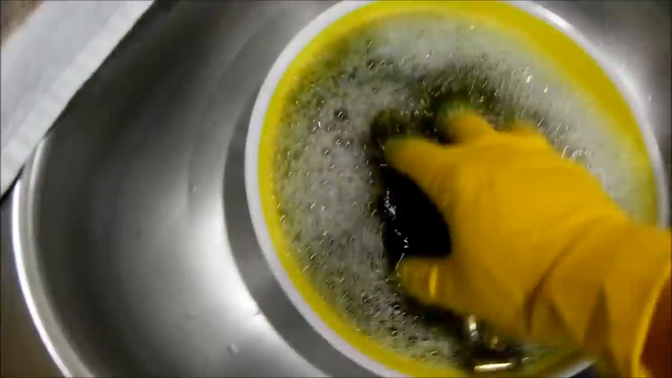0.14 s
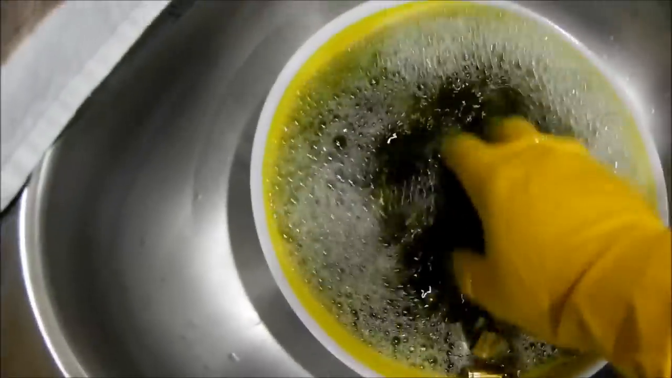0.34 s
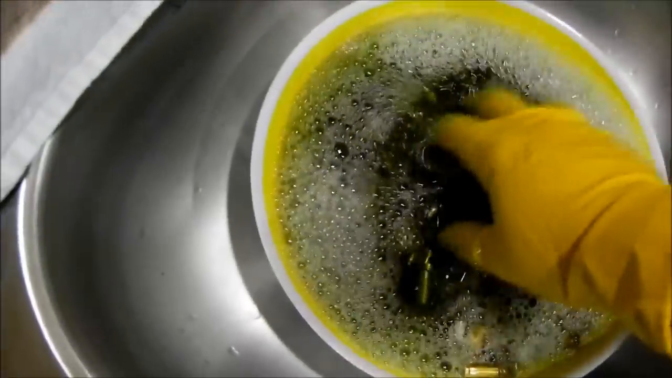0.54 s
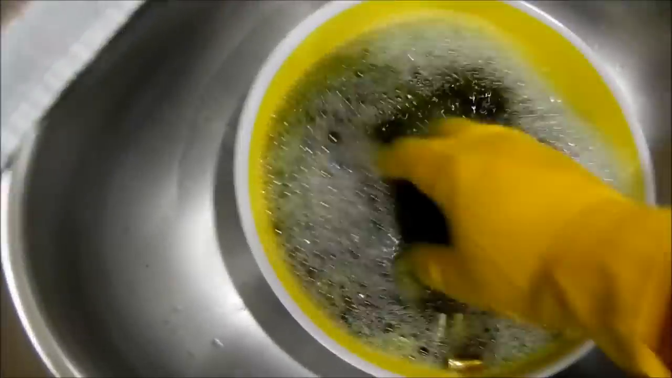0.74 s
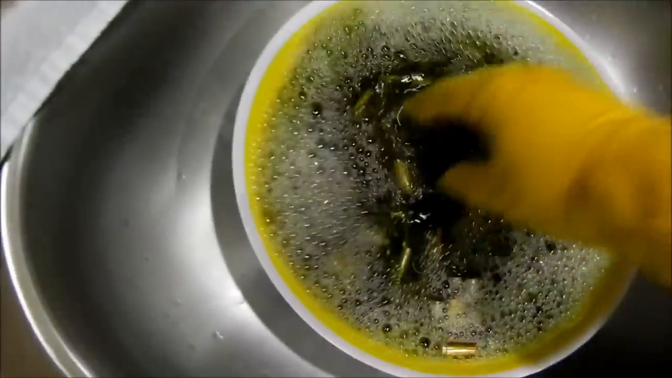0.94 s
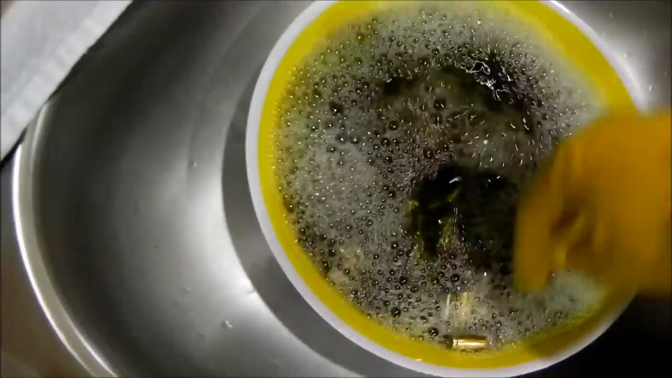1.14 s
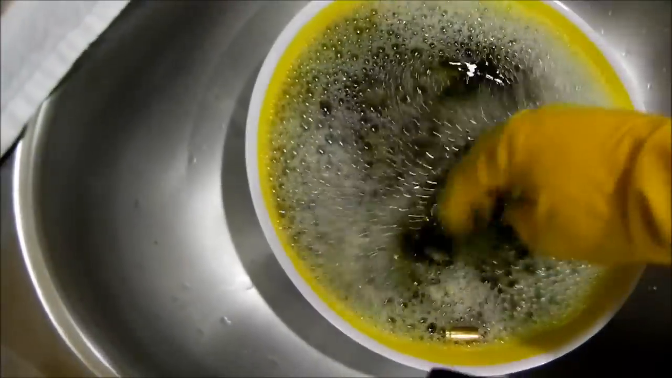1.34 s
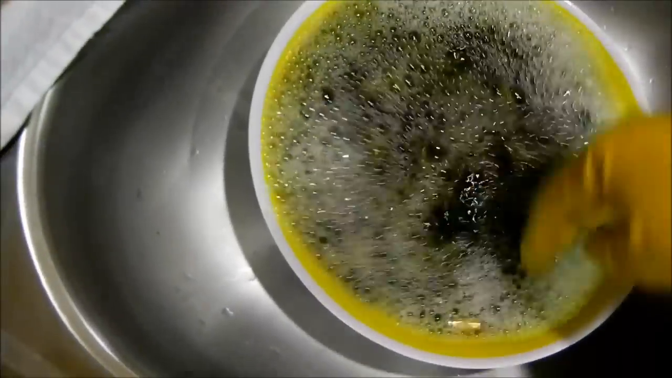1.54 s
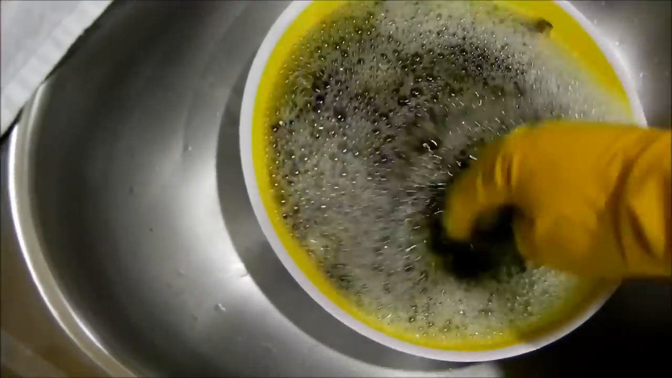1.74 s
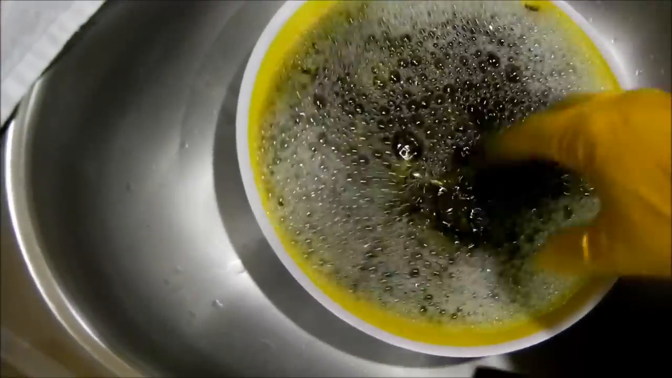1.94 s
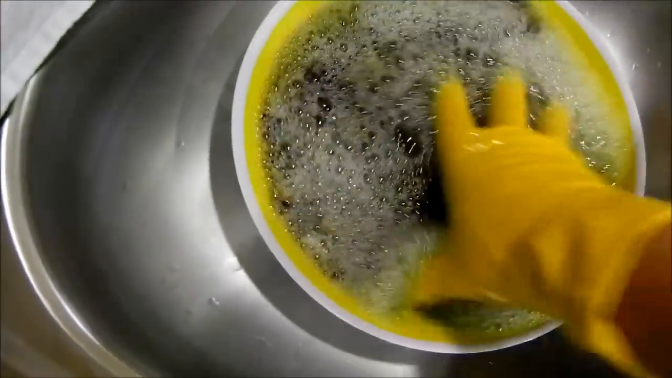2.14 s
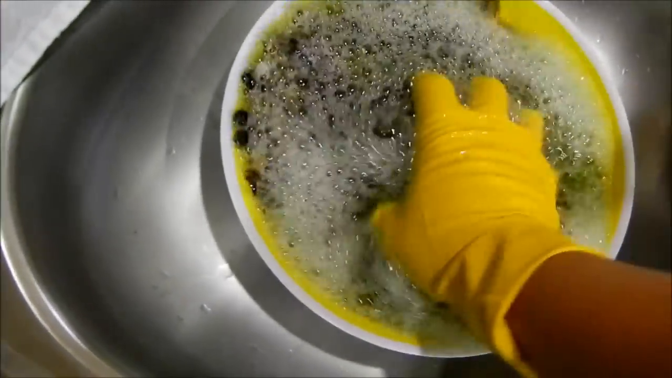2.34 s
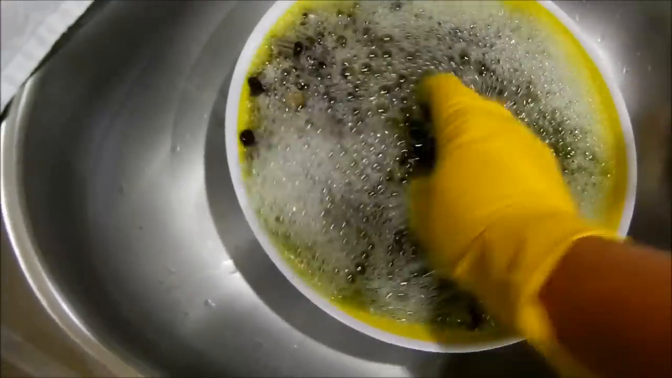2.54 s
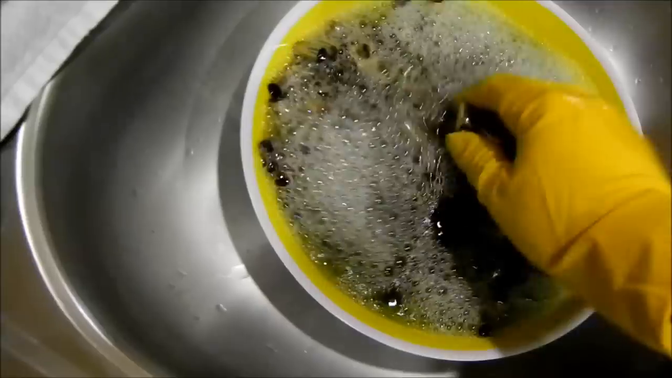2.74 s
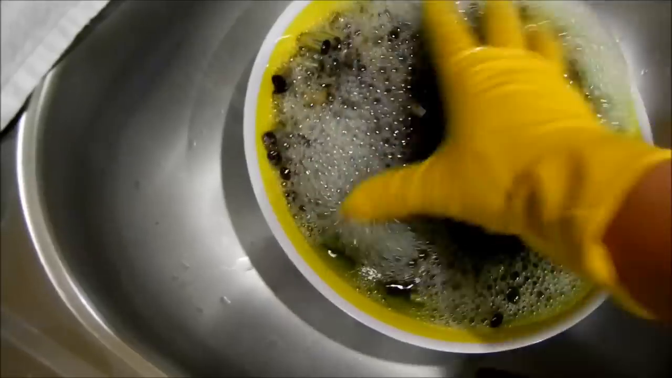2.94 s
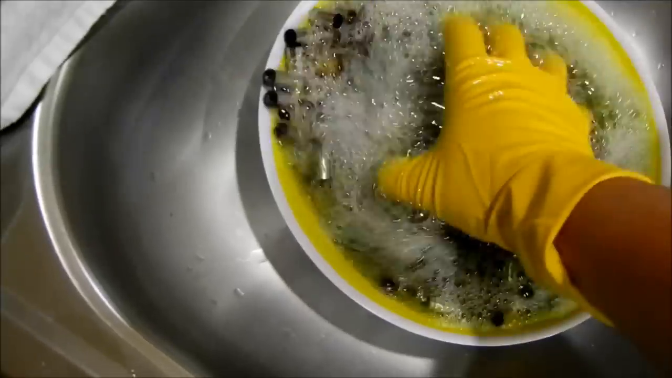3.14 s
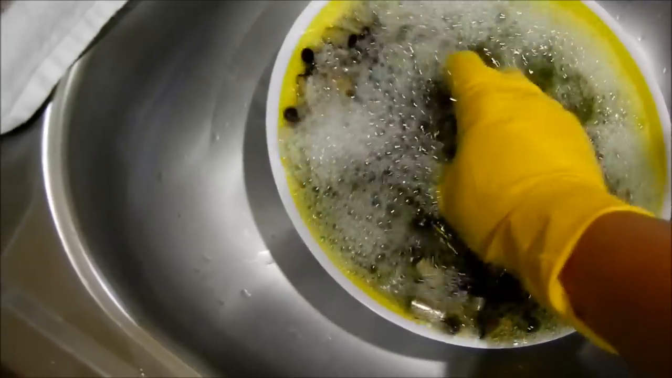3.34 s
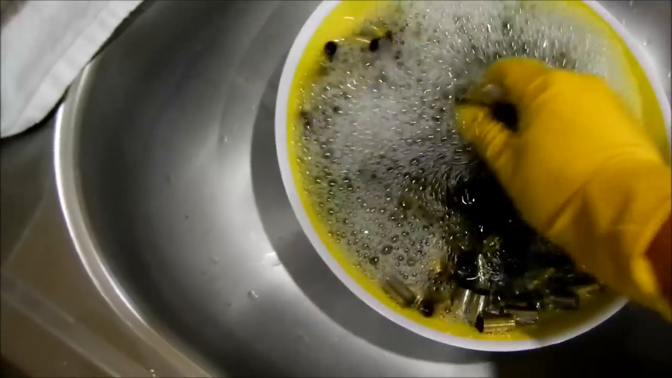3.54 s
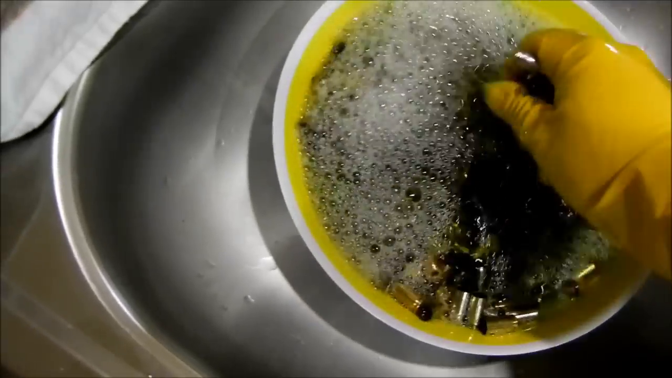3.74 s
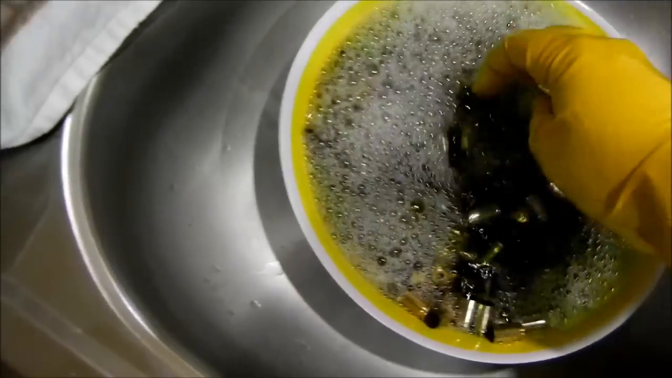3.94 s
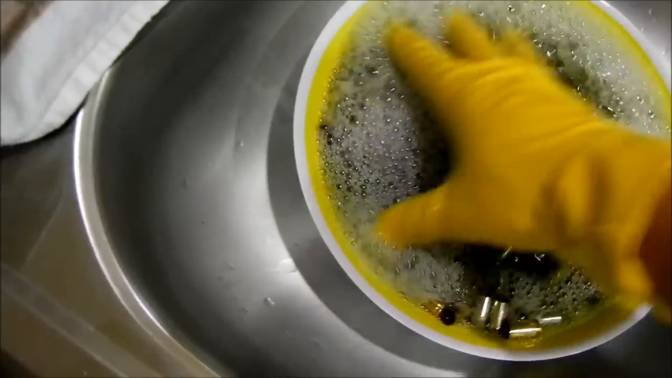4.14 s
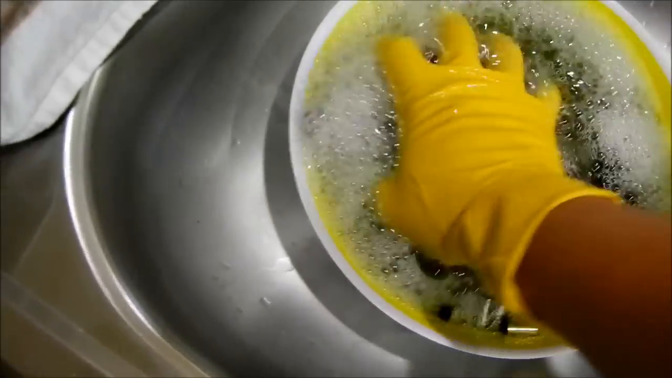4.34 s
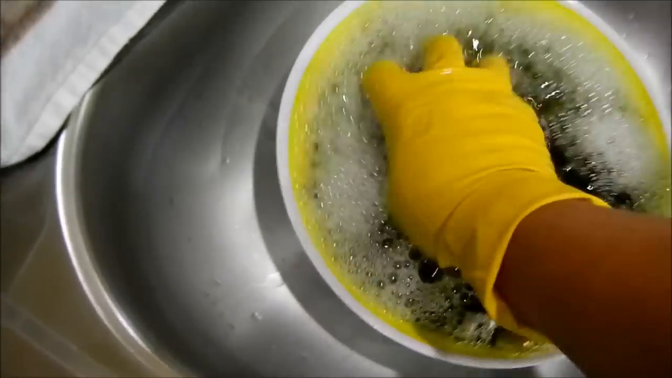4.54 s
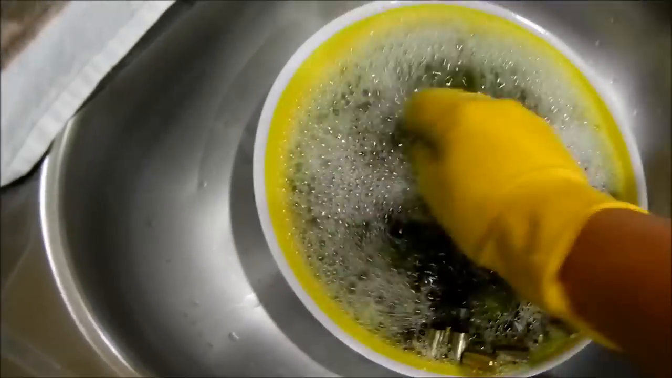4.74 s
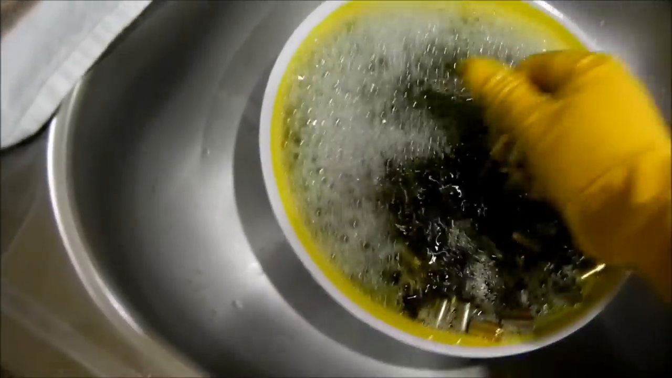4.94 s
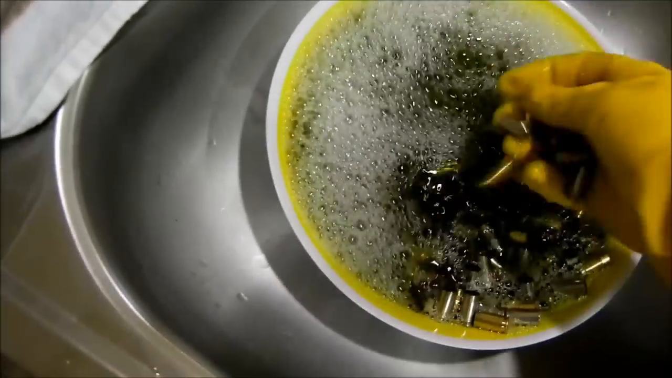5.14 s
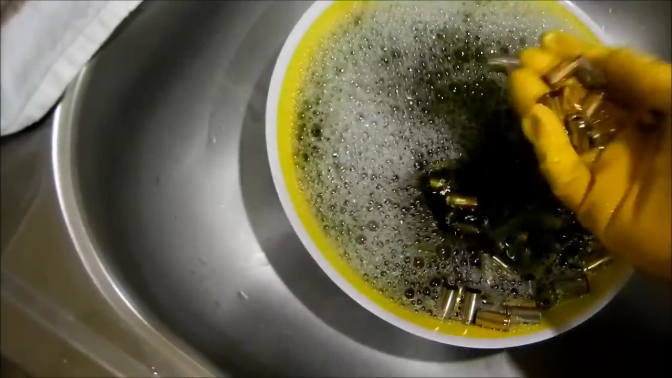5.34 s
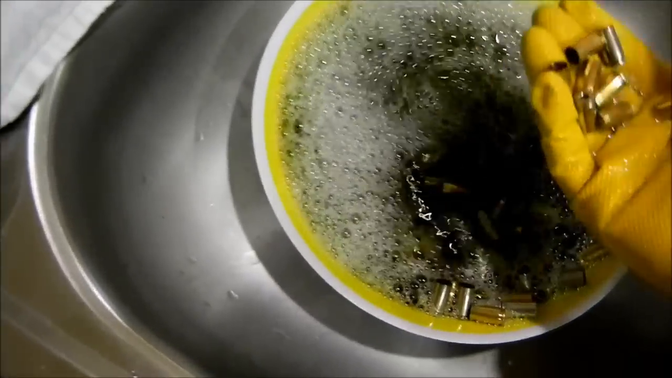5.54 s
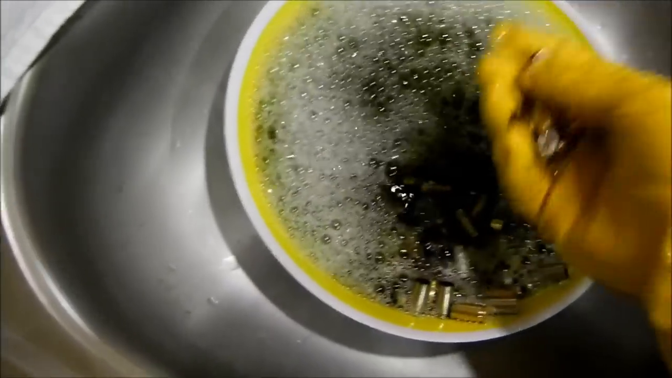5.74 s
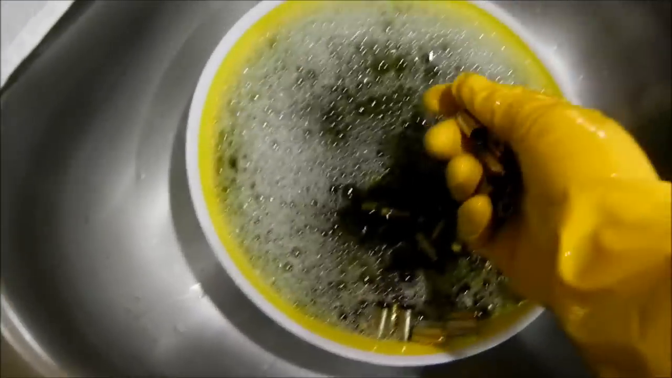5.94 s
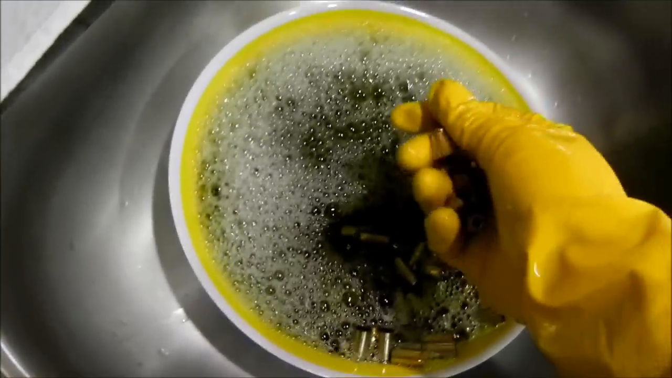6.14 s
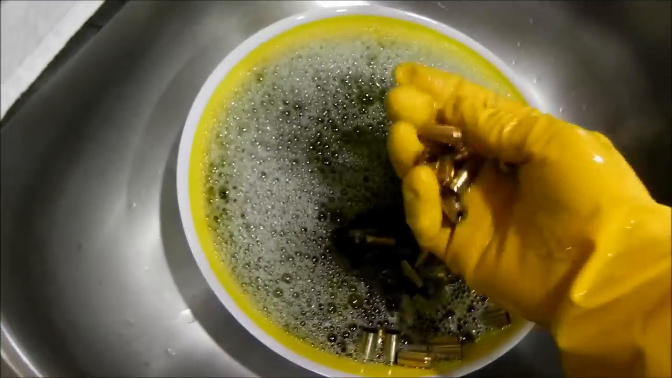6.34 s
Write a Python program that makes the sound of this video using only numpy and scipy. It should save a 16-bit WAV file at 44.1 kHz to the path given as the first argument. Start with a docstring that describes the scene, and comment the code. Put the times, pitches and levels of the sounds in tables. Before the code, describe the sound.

Metal cases grind and rattle underwater in a plastic bowl, followed by sharp clacks and high clinks, over a faint hum.

```python
"""Dense, wet grinding over a low drumming, then clacks and high rings, with a faint mains hum behind.
A gloved hand scrubs brass cartridge cases in a plastic bowl of soapy water, standing in a steel sink.
Under water the cases rub in damped contacts and drum on the bowl. Then a handful is lifted out:
single cases drop back with a clack, and those in the air ring high."""
import sys
import numpy as np
from scipy import signal
from scipy.fft import rfft, irfft, next_fast_len
from scipy.io import wavfile
from scipy.ndimage import map_coordinates

SR = 44100
rng = np.random.default_rng(int(sys.argv[2]) if len(sys.argv) > 2 else 0)


def int16_out(signal):
    """Quantize to a 16-bit WAV file."""
    q = np.round(np.clip(np.atleast_2d(signal).T, -1, 1) * 32767)
    wavfile.write(sys.argv[1], SR, q.astype(np.int16))


N = 286209

# Event levels are relative within each source.
# Hand strokes through the heap. Each row: start, length, rise and release t60 in seconds,
# grinding level in dB, sharp edges over grinding in dB, slosh level in dB.
HAND_STROKES = [(-.05, 0.25, 0.0041, .3, -19, -9.5, -50.5), (0.166, 0.62, 0.036, 0.49, -15, -7.5, -50),
                (0.709, 0.19, 0.065, 0.64, -14.5, -8.5, -54.5), (0.983, 0.21, 0.042, 0.14, -19, -8.5, -57),
                (1.285, 0.22, .008, 0.74, -13.5, -7.5, -39), (1.704, 0.21, 0.073, 0.66, -13, -6, -40),
                (1.971, 0.12, 0.033, 0.37, -19, -9, -41.5), (2.216, 0.25, 0.051, 0.9, -15, -5, -37),
                (2.484, .49, 0.1, 0.14, -15.5, -7.5, -62.5), (3.08, 0.2, 0.055, 0.52, -14, -6.5, -40),
                (3.274, 0.14, 0.07, 0.31, -15.5, -6.5, -45.5), (3.488, 0.39, 0.012, 0.59, -17.5, -8, -51),
                (3.996, 0.27, 0.032, 0.5, -21.5, -12.5, -50), (4.316, 0.23, 0.064, 1, -15, -7, -41),
                (4.613, 0.11, 0.056, 0.44, -14, -6.5, -57), (4.782, 0.046, 0.036, 0.72, -16, -9, -70),
                (4.896, 0.15, 0.043, 0.33, -21, -8, -49)]
# Jammed clumps giving way. Each row: start in seconds, length in seconds, level in dB.
CLUMP_SLIPS = [(0.015, 0.04, -15), (0.087, 0.0077, -20.5), (0.235, 0.0054, -13.5), (0.682, .008, -14),
               (1.353, 0.033, -15), (2.15, 0.068, -13), (2.271, 0.037, -15), (2.922, 0.021, -12.5),
               (2.972, 0.015, -13), (3.205, 0.021, -15.5), (3.675, 0.011, -14), (3.725, 0.0063, -16.5),
               (3.843, 0.009, -15.5), (3.971, 0.0134, -15.5), (4.034, 0.01, -12), (4.089, 0.043, -14),
               (4.169, 0.049, -17), (4.239, 0.021, -15.5), (4.923, 0.0079, -16), (5.177, 0.0045, -15.5)]
# Single hard contacts. Each row: start in seconds, level in dB, treble offset in dB.
CASE_CLACKS = [(1.193, -2.5, 11), (1.615, 2, -17), (1.634, -3.5, 6.5), (1.734, 3.5, 9), (1.986, 0, 11),
               (2.017, -5, 15), (2.08, 1, 3), (2.1232, 1, -4), (2.212, -12, -3), (2.7985, -2, 7),
               (3.654, -7, 7.5), (3.828, -17, 4), (3.847, 0, -1), (3.971, 3, 3), (4.004, 1, 7),
               (4.024, 3.5, -2), (4.039, 7, 4), (4.059, 1.5, -1), (4.162, 3, -4), (4.173, -1, 7),
               (4.243, 1, -4), (4.251, 0.5, 5), (4.316, -2.5, 8.5), (4.42, -7, 17), (5.169, 6.5, -4),
               (5.182, 0.5, 10), (5.19, 5.5, 6.5), (5.2165, -1, -7), (5.23, -2.5, -2), (5.271, 4.5, -20),
               (5.295, -5, 5), (5.319, -3.5, 6), (5.357, 4.5, 10.5), (5.448, 4, 7.5), (5.511, 2, 8.5),
               (5.6006, 4.5, 11.5), (5.683, -5.5, -3), (5.733, -7, -7), (5.751, -9, 1), (5.8, -14.5, 6),
               (5.842, -23, 12), (5.865, -11, -6), (5.89, -11.5, -8), (6.024, -17.5, -6),
               (6.137, -11.5, -20), (6.152, -14.5, 7), (6.194, -7, 3), (6.246, -19, -3), (6.3456, -14.5, 1),
               (6.401, -19, 13), (6.427, -11, 2)]
# Modes of a struck case. Each row: mean pitch in Hz, level in dB, t60 in seconds before water damping.
CASE_MODES = [(2058, 1, 0.043), (2780, 0.5, 0.025), (3890, 3, 0.021), (7730, -8, 0.11), (9740, -7, 0.043),
              (13600, -21, 0.0073)]
# Cases ringing in the air. Each row: start in seconds, pitch in Hz, level in dB, t60 in seconds.
AIR_PINGS = [(3.875, 8900, -12, 0.03), (3.988, 9900, -14, 0.058), (4.004, 9360, 1, 0.037),
             (5.01, 9450, -22.5, 0.047), (5.032, 8950, -14, 0.055), (5.177, 10150, -12, 0.052),
             (5.247, 10870, -13.5, 0.17), (5.425, 10500, -22, 0.046), (5.448, 10900, -19, 0.16),
             (5.546, 8360, -21, 0.078), (5.842, 10750, -15.5, .03), (6.152, 11700, -9, 0.032),
             (6.194, 11150, -18.5, 0.079), (6.345, 11200, -14.5, 0.026), (6.401, 10850, -30, 0.083),
             (6.437, 11200, -22, 0.13)]
# Air pockets pinching off. Each row: start in seconds, initial pitch in Hz, level in dB, t60 in seconds.
AIR_POCKETS = [(4.193, 1810, -5, 0.04), (4.207, 1685, -6.5, 0.064), (4.274, 1860, 0.5, 0.023),
               (5.141, 3240, -10, 0.033), (5.152, 3050, -10, 0.06), (5.851, 3800, -15, 0.013),
               (5.852, 4700, -13.5, 0.01), (6.39, 1400, -27, 0.097)]
# The hand leaning on the bowl's bottom. Each row: centre time in seconds, drumming level in dB.
HAND_LEANS = [(.03, -33), (.56, -37), (1.35, -32), (1.88, -44), (2.29, -38), (2.75, -43), (3.71, -36),
              (4.14, -37.5), (4.51, -36), (4.9, -37.5), (5.08, -35)]
# Drum modes of the bowl. Each row: frequency in Hz, width in Hz, level in dB.
BOWL_MODES = [(143, 45, -11), (190.3, 15.5, 6), (240, 32, -14)]
# Spectra. Each row: frequency in Hz, relative spectral density in dB.
HEAP_SPECTRUM = [(40, -57), (280, -17.5), (400, -19), (540, -16), (670, -7.5), (750, -9.5), (860, -1),
                 (1090, -9), (1480, -6.5), (1620, -2), (1900, -1.5), (2050, 3), (2250, -2), (2700, -2),
                 (3700, -5), (5000, -14.5), (8000, -35)]  # wet heap in its bowl
EDGE_SPECTRUM = [(2500, -36), (4500, -7), (5500, -0.5), (7500, 0), (9500, -6.5), (11500, -12), (15500, -13)]  # brass on brass
KNOCK_SPECTRUM = [(40, -45), (130, -31), (220, -11), (550, -5), (820, 1), (1250, -4.5), (2200, 2),
                  (3000, 2.5), (5000, -8), (8000, -20)]  # one case on the bowl
TICK_SPECTRUM = [(150, -34), (700, -17), (2500, 2), (5000, -1), (9500, -6), (12000, -17.5), (15500, -15)]  # bright edge of that knock
CUPPED_SPECTRUM = [(300, -16), (1100, -13), (2000, 3), (3300, -3), (5000, -28), (8000, -30)]  # case on case in the glove
SLOSH_SPECTRUM = [(12, -25), (28, -22), (55, -14), (86, 6), (110, -9), (140, 7.5), (260, -28)]  # moving water
ROOM_SPECTRUM = [(12, -20), (35, -13), (130, -14), (230, -8.5), (400, -9.5), (850, -10.5), (2200, -10),
                 (5000, -23), (15500, -30.5)]  # room noise
# Stereo spread of the sink. Each row: frequency in Hz, side gain in dB.
SINK_WIDTH = [(60, -19), (110, -34), (200, -29), (380, -60), (700, -16), (1290, -19), (2380, -12.5),
              (4400, -11), (8120, -7.5), (15000, -5)]
# Mains hum partials. Each row: frequency in Hz, rms level in dB.
MAINS_HUM = [(119, -57), (241, -56.5)]

TOP_HZ = 15900
CALM_S = 5.605  # hand out: heap and bowl start to settle
LIFTED_S = 6.1  # from here cases clack only within the glove


def grinding(grind, edges):
    """Cases rub under water; harder stirring makes more contacts, which come in clumps."""
    slips, clumps = slipping(), wobble(90)
    body = np.hypot(grind, slips * amp(0.5))
    edge = np.hypot(edges, slips * amp(-8.5))
    rate_hz = 400 + 3000 * body / body.max()
    dull = coloured(rattle(rate_hz, spread_db=3.5, t60_s=0.022, sink_db=-14), HEAP_SPECTRUM)
    sharp = coloured(rattle(rate_hz, spread_db=2.5, t60_s=0.005, sink_db=-13.5), EDGE_SPECTRUM)
    low_rings = clinks(rate_hz=220, spread_db=10.5, low_hz=1519, high_hz=4110, cycles=56)
    high_rings = clinks(rate_hz=110, spread_db=10, low_hz=4230, high_hz=9560, cycles=260)
    snaps = rattle(45, spread_db=4, t60_s=0.016, sink_db=-16)  # rims flick past each other
    low = amp(1.04 * clumps) * dull + amp(-10) * low_rings + amp(-14.5) * coloured(snaps, KNOCK_SPECTRUM)
    high = amp(2 * clumps) * sharp + amp(-11) * high_rings + amp(-23) * coloured(snaps, TICK_SPECTRUM)
    return amp(-0.18) * body * low + amp(-0.5) * edge * high


def stirring(sag_db_per_s=3.5):
    """Grind, edge and slosh envelopes: strokes add power to the shifting heap and lapping water."""
    t, unrest = np.arange(N) / SR, calming(db_per_s=50)
    grind_power = (amp(-27.5) * unrest) ** 2
    edge_power = (amp(-40.5) * unrest) ** 2
    slosh_power = np.full(N, amp(-55) ** 2)
    for start_s, length_s, rise_s, t60_s, db, edge_db, slosh_db in HAND_STROKES:
        sag_db = sag_db_per_s * np.maximum(t - start_s, 0)  # the heap gives way
        effort = amp(db - sag_db) * swell(start_s, length_s, rise_s, t60_s)
        wave = amp(slosh_db) * swell(start_s, length_s=0.048, rise_s=0.048, t60_s=0.85)
        grind_power += effort ** 2
        edge_power += (amp(edge_db) * effort) ** 2
        slosh_power += wave ** 2
    return np.sqrt([grind_power, edge_power, slosh_power])


def slipping():
    """Envelope of sudden slides: each starts sharply and dies as the clump settles."""
    level, t = np.zeros(N), np.arange(SR // 4) / SR
    for start_s, length_s, db in CLUMP_SLIPS:
        settling = fade(np.maximum(t - length_s, 0), t60_s=0.031)
        add(level, start_s, amp(db) * attack(t, 0.00094) * settling)
    return level


def rattle(rate_hz, spread_db, t60_s, sink_db, spots=8):
    """Random uneven contacts at several spots in the heap, each spot with its own ring."""
    out = np.zeros((2, N))
    for _ in range(spots):
        hits = (rng.random(N) < rate_hz / spots / SR) * rng.choice([-1, 1], N)
        blows = hits * amp(spread_db * np.clip(rng.standard_normal(N), -2, 2))
        out += signal.oaconvolve(blows[None], contact(t60_s, sink_db, sink_t60_s=0.13), axes=1)[:, :N]
    return unit(out / np.sqrt(rate_hz))


def contact(t60_s, sink_db, sink_t60_s, grit_db=3):
    """One contact, mid and side: an uneven, fast-dying crack, then the sink's weak echo."""
    t = np.arange(SR // 6) / SR
    burst = rng.standard_normal((2, len(t))) * amp(grit_db * rng.standard_normal(len(t)))
    burst *= fade(t, t60_s) + amp(sink_db) * fade(t, sink_t60_s)
    return burst / np.linalg.norm(burst, axis=1, keepdims=True)


def clinks(rate_hz, spread_db, low_hz, high_hz, cycles):
    """Brief damped rings at random times and pitches; cycles is the mean t60 in periods."""
    out, t = np.zeros((2, N)), np.arange(SR // 30) / SR
    for when, pitch, size, life, place in rng.random((int(rate_hz * N / SR), 5)):
        hz = low_hz * (high_hz / low_hz) ** pitch
        ring = np.cos(2 * np.pi * hz * t) * fade(t, cycles * (0.5 + life) / hz)
        mid_side = np.array([[1], [np.cos(np.pi * place)]])
        add(out, when * N / SR, amp(spread_db * size) * mid_side * ring)
    return unit(out)


def clacks(wet_hz=7000):
    """Single cases hit the bowl or each other: a knock, a bright tick and a short ring."""
    knocks, held, ticks, rings = np.zeros((4, 2, N))
    t = np.arange(SR // 12) / SR
    for start_s, db, treble_db in CASE_CLACKS:
        knock = amp(db + 8) * contact(t60_s=0.043, sink_db=-20.5, sink_t60_s=0.26)
        tick = amp(-8) * contact(t60_s=0.026, sink_db=-11, sink_t60_s=0.04)
        metal_bite = amp(-6) * contact(t60_s=0.0039, sink_db=-40, sink_t60_s=0.02)
        add(knocks if start_s < LIFTED_S else held, start_s, knock)
        add(ticks, start_s, amp(db + treble_db) * (tick + metal_bite))
        for hz, mode_db, t60_s in CASE_MODES:
            hardness_db = treble_db * hz / TOP_HZ  # harder blows reach higher modes
            pitch_hz = hz * (1 + 0.055 * rng.standard_normal())
            tone = np.sin(2 * np.pi * pitch_hz * t + rng.uniform(0, 2 * np.pi, (2, 1)))
            ring_db = db + mode_db + hardness_db - 19 + 1.8 * rng.standard_normal()
            wet_t60_s = t60_s / (1 + hz / wet_hz)  # a water film damps the ring
            add(rings, start_s, amp(ring_db) * tone * fade(t, wet_t60_s) * attack(t, 0.00015))
    body = coloured(knocks, KNOCK_SPECTRUM) + coloured(held, CUPPED_SPECTRUM)
    return body + coloured(ticks, TICK_SPECTRUM) + rings


def pings(width_hz=70):
    """A case's mouth rings as a close pair of modes; chatter against its neighbours blurs the pitch."""
    out, t = np.zeros((2, N)), np.arange(SR // 4) / SR
    for start_s, hz, db, t60_s in AIR_PINGS:
        drift = np.cumsum(rng.standard_normal((2, 2, len(t))), axis=-1)
        phase = rng.uniform(0, 2 * np.pi, (2, 2, 1)) + drift * np.sqrt(2 * np.pi * width_hz / SR)
        upper_hz = hz + rng.uniform(50, 194)
        pair = np.sin(2 * np.pi * hz * t + phase[0]) + 0.53 * np.sin(2 * np.pi * upper_hz * t + phase[1])
        add(out, start_s, amp(db - 5) * pair * fade(t, t60_s) * attack(t, 0.00035))
    return out


def bubbles():
    """Each bubble rings and rises a little in pitch as it nears the surface."""
    out, t = np.zeros((2, N)), np.arange(SR // 8) / SR
    for start_s, hz, db, t60_s in AIR_POCKETS:
        tone = np.sin(2 * np.pi * hz * t * (1 + 0.092 * t / t60_s))
        add(out, start_s, amp(db) * tone * fade(t, t60_s) * attack(t, 0.00088))
    return out


def squelch():
    """Water squeezed from the lifted handful: tiny bubbles burst between the glove's fingers."""
    squeeze = amp(-34) * swell(start_s=6.338, length_s=0.1, rise_s=0.015, t60_s=0.25)
    return squeeze * clinks(rate_hz=930, spread_db=2, low_hz=1550, high_hz=3370, cycles=28)


def bowl(waves):
    """The heap drums on the bowl's bottom, most where the hand leans on it; the water sloshes."""
    t, lean_sigma_s = np.arange(N) / SR, 0.06
    leaning = sum(amp(db) * np.exp(-0.5 * ((t - at_s) / lean_sigma_s) ** 2) for at_s, db in HAND_LEANS)
    rolling = amp(-41 + 1.9 * wobble(7)) * calming(db_per_s=27)
    drum = unit(filtered(rng.standard_normal((2, N)), bowl_response))
    slosh = coloured(rng.standard_normal((2, N)), SLOSH_SPECTRUM)
    return np.hypot(rolling, leaning) * drum + waves * amp(-1 + 3.1 * wobble(9)) * slosh


def bowl_response(hz, cutoff_hz=500):
    """The bowl's drum modes, alternating in sign and low-passed."""
    response = 0
    for k, (mode_hz, width_hz, db) in enumerate(BOWL_MODES):
        damping = 1j * hz * width_hz
        response += (-1) ** k * amp(db) * damping / (mode_hz ** 2 - hz ** 2 + damping)
    return response / (1 + (hz / cutoff_hz) ** 4)


def background():
    """Mains hum and diffuse room noise, left and right."""
    t = np.arange(N) / SR
    hum = sum(amp(db) * np.sqrt(2) * np.sin(2 * np.pi * hz * t + 0.27 * wobble(2.42))
              for hz, db in MAINS_HUM)
    mid, side = amp([[-43.5], [-47.5]]) * coloured(rng.standard_normal((2, N)), ROOM_SPECTRUM)
    return hum + np.array([mid + side, mid - side])


def amp(db):
    """Decibels to gain."""
    return 10 ** (np.asarray(db) / 20)


def unit(x):
    """Scale to rms 1."""
    return x / np.sqrt(np.mean(x ** 2) + 1e-20)


def along(points, hz):
    """Interpolate (Hz, value) points on a log axis."""
    point_hz, values = np.transpose(points)
    return np.interp(np.log(hz + 1), np.log(point_hz), values)


def wobble(rate_hz):
    """Smooth random curve with knots at rate_hz."""
    return map_coordinates(rng.standard_normal(int(N * rate_hz / SR) + 4), [np.arange(N) * rate_hz / SR])


def attack(t, rise_s):
    """Linear rise from 0 to 1."""
    return np.clip(t / rise_s, 0, 1)


def fade(t, t60_s):
    """Fall by 60 dB in t60_s."""
    return np.exp(-np.log(1000) * t / t60_s)


def swell(start_s, length_s, rise_s, t60_s):
    """Envelope: rise, hold until length_s is over, decay."""
    t = np.arange(N) / SR - start_s
    return attack(t, rise_s) * fade(np.maximum(t - length_s, 0), t60_s)


def calming(db_per_s):
    """1 until CALM_S, then a steady decline."""
    return amp(-db_per_s * np.maximum(np.arange(N) / SR - CALM_S, 0))


def add(track, start_s, sound):
    """Mix a sound into a track."""
    part = track[..., max(round(start_s * SR), 0):][..., :sound.shape[-1]]
    part += sound[..., :part.shape[-1]]


def filtered(x, response):
    """Apply a complex frequency response."""
    size = next_fast_len(N + SR // 4, True)
    return irfft(rfft(x, size) * response(np.fft.rfftfreq(size, 1 / SR)), size)[..., :N]


def coloured(x, spectrum, size=4096):
    """Apply a minimum-phase filter of energy 1 with the given spectrum."""
    cepstrum = irfft(np.log(amp(along(spectrum, np.fft.rfftfreq(size, 1 / SR)))))
    cepstrum[1:size // 2] *= 2
    cepstrum[size // 2 + 1:] = 0
    kernel = irfft(np.exp(rfft(cepstrum)))
    return signal.oaconvolve(x, kernel[None] / np.linalg.norm(kernel), axes=1)[:, :N]


def scene():
    """Bowl sources over the background; the sink spreads the treble more than the bass."""
    grind, edges, waves = stirring()
    mid, side = grinding(grind, edges) + clacks() + pings() + bubbles() + squelch() + bowl(waves)
    side = filtered(side, lambda hz: amp(along(SINK_WIDTH, hz)))
    return np.array([mid + side, mid - side]) * amp([[-0.2], [0.2]]) + background()


def record(dry):
    """Round off the highest peaks and cut everything above TOP_HZ."""
    rounded = dry / (1 + np.abs(dry) ** 6) ** (1 / 6)
    return filtered(rounded, lambda hz: hz < TOP_HZ)


dry = scene()
out = record(dry)
int16_out(out)
```